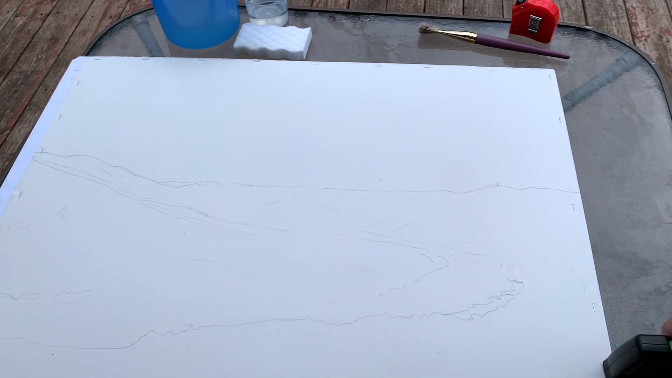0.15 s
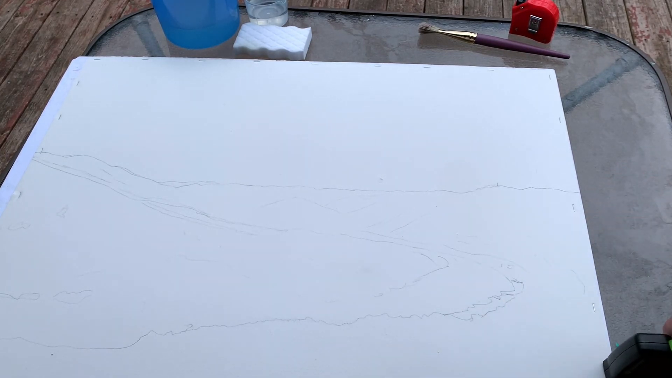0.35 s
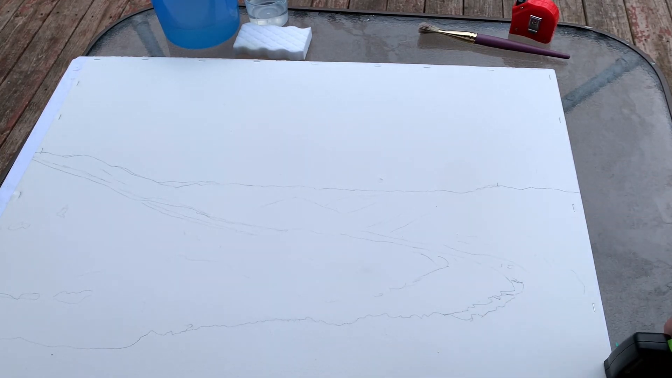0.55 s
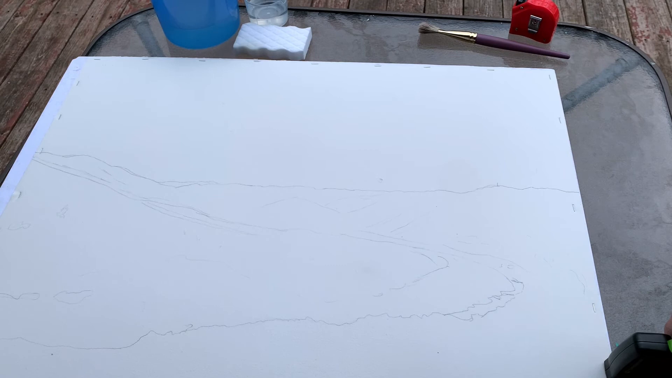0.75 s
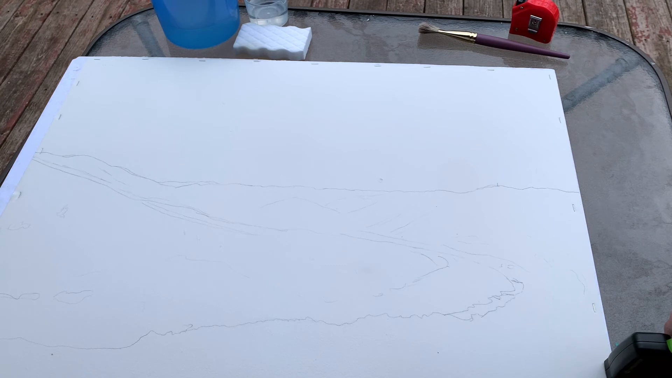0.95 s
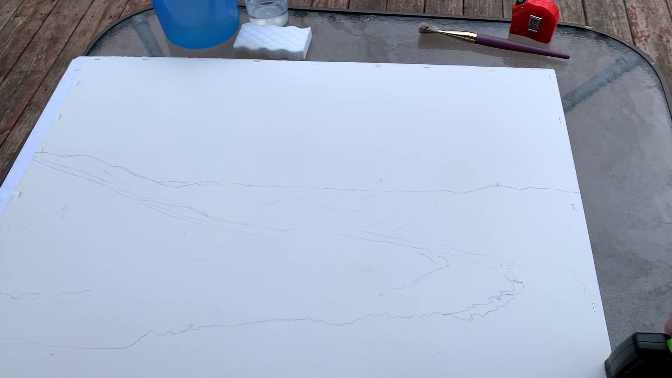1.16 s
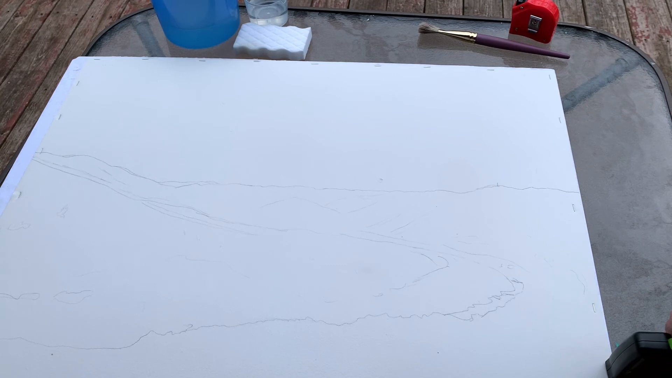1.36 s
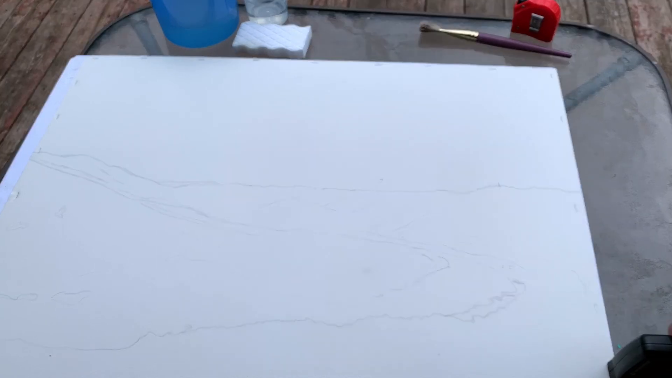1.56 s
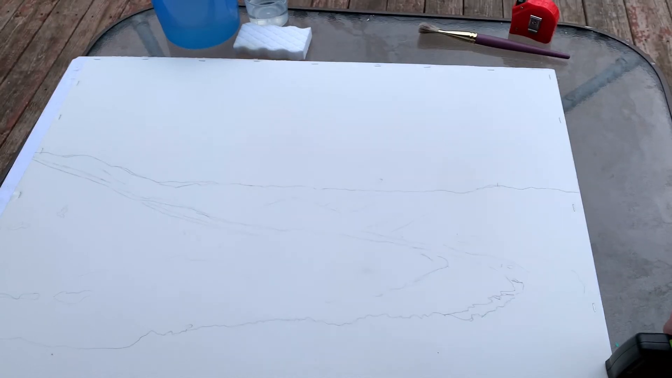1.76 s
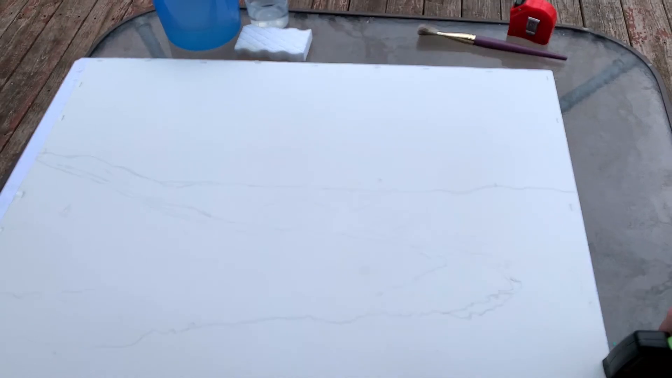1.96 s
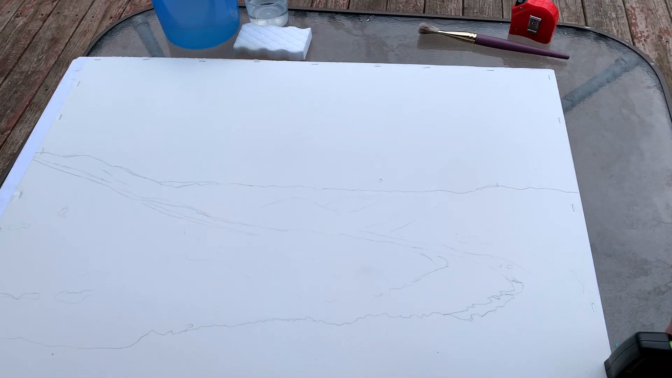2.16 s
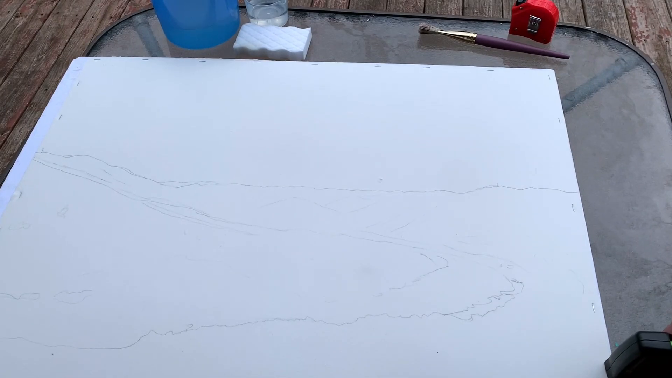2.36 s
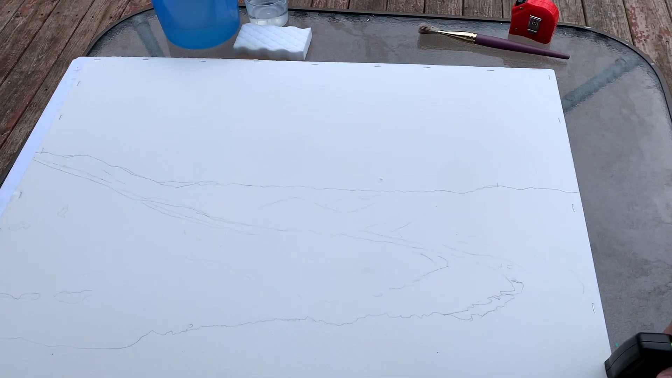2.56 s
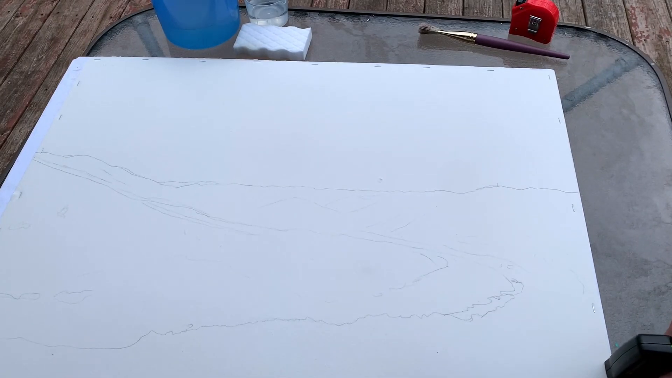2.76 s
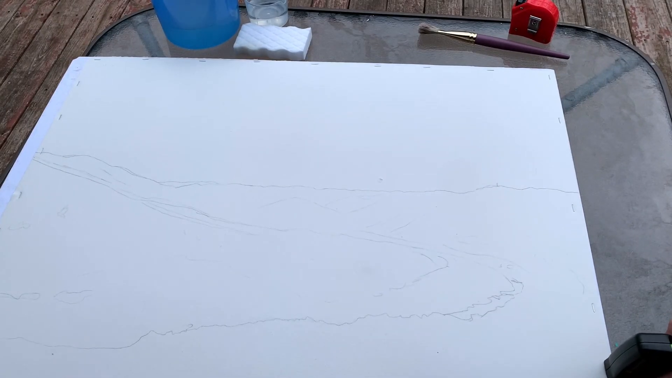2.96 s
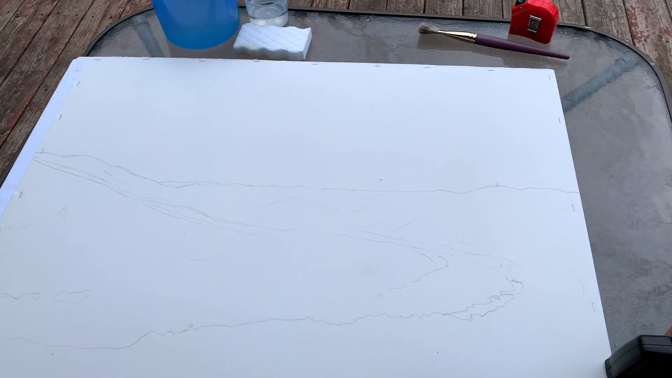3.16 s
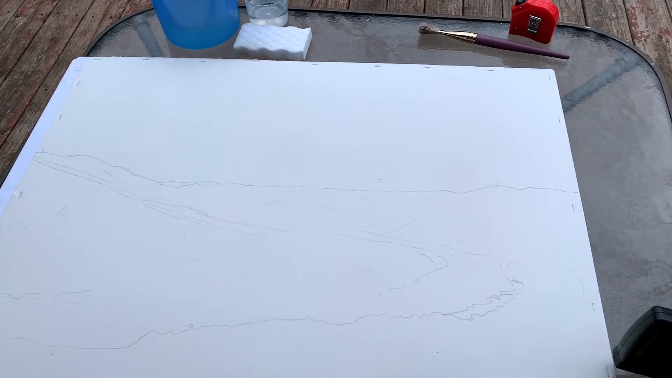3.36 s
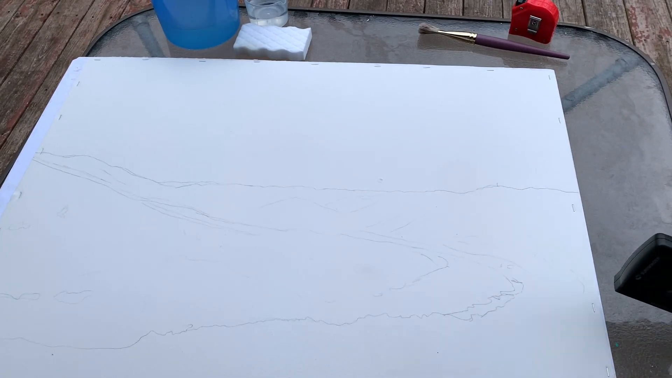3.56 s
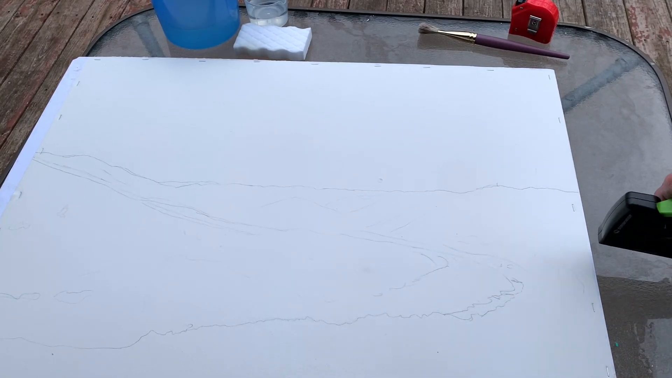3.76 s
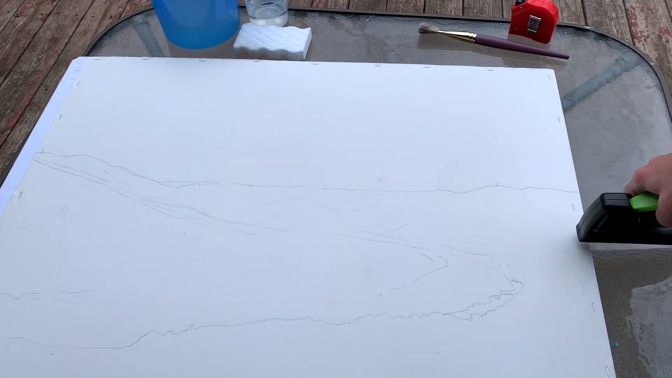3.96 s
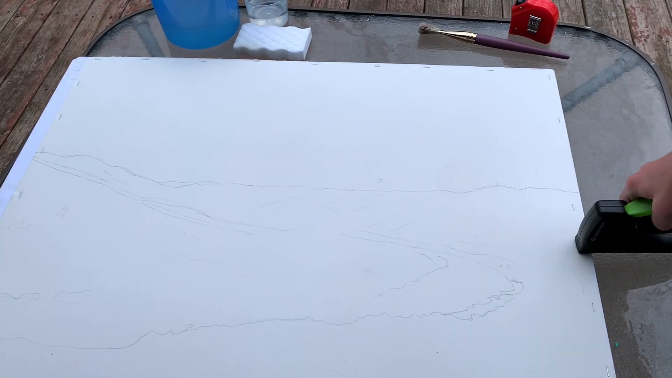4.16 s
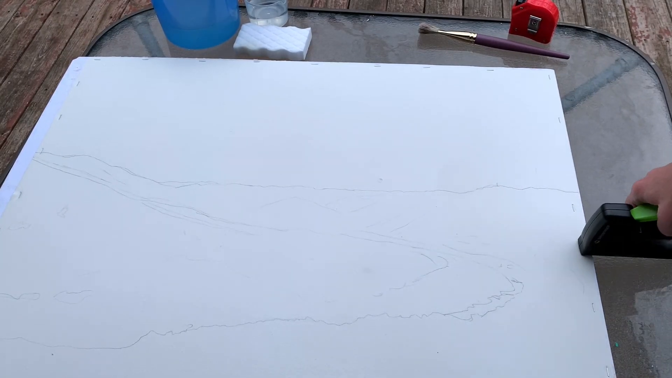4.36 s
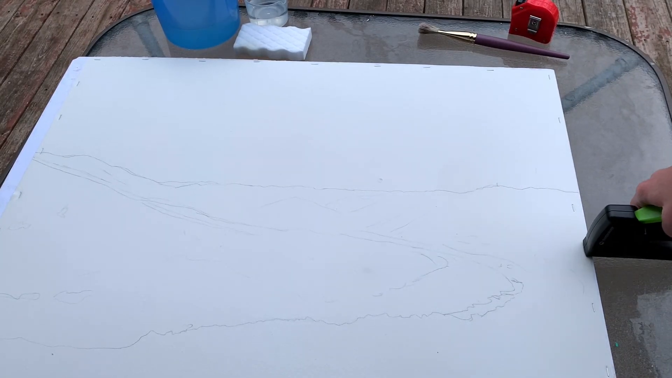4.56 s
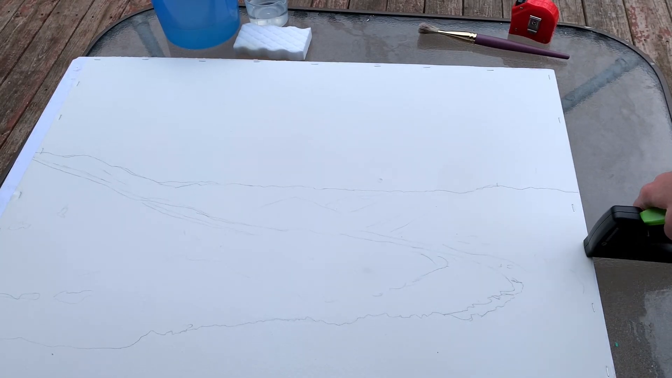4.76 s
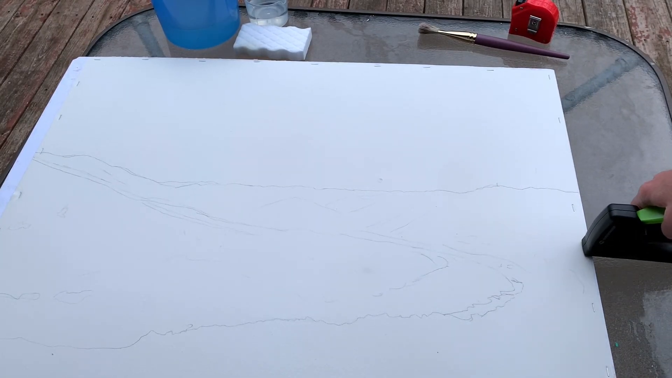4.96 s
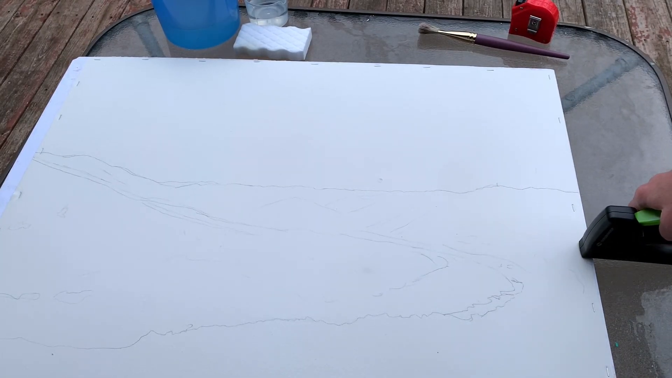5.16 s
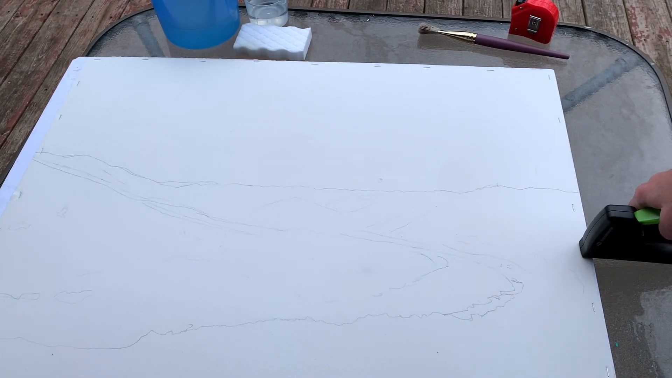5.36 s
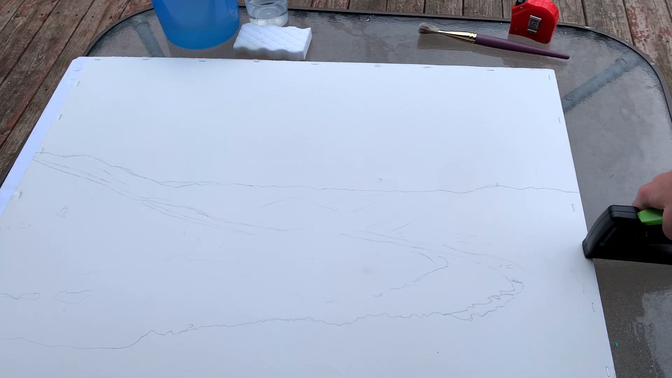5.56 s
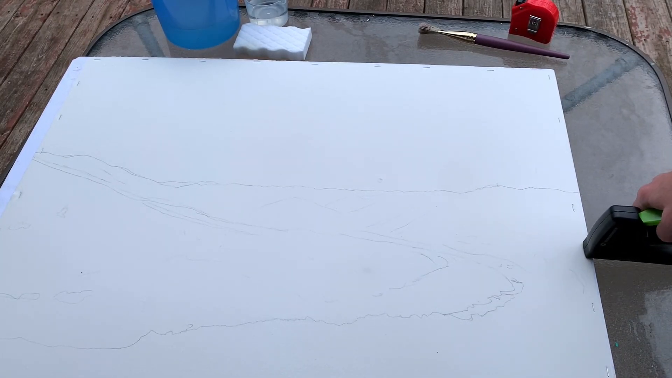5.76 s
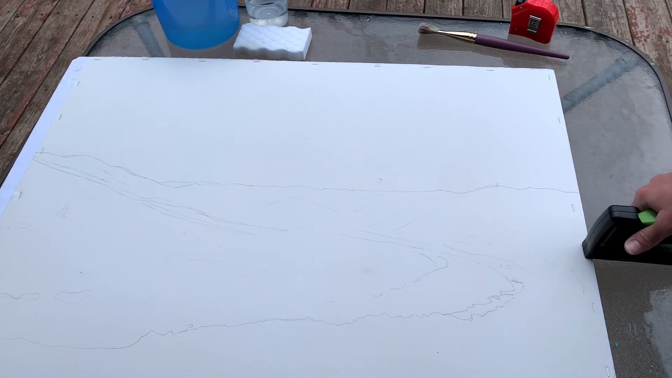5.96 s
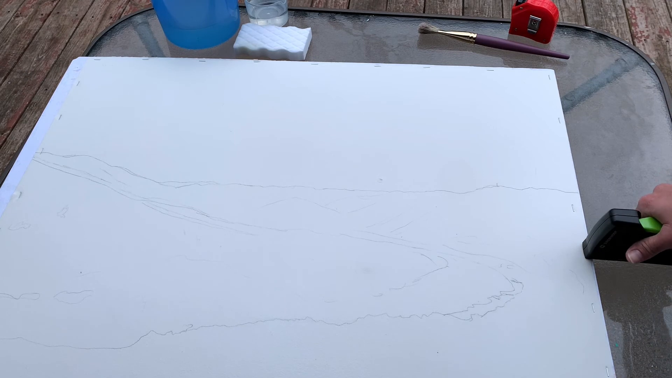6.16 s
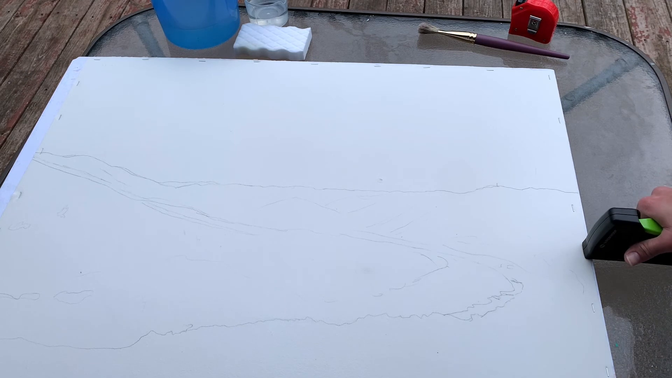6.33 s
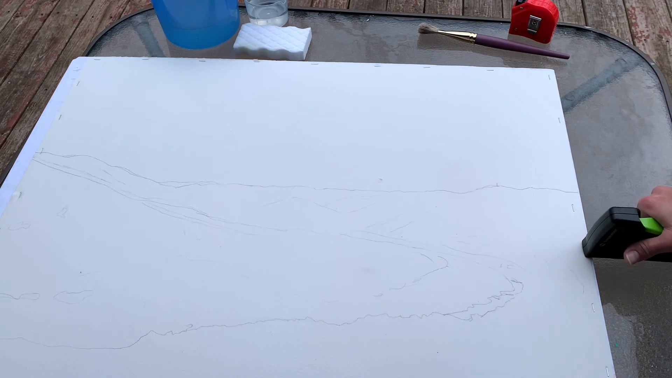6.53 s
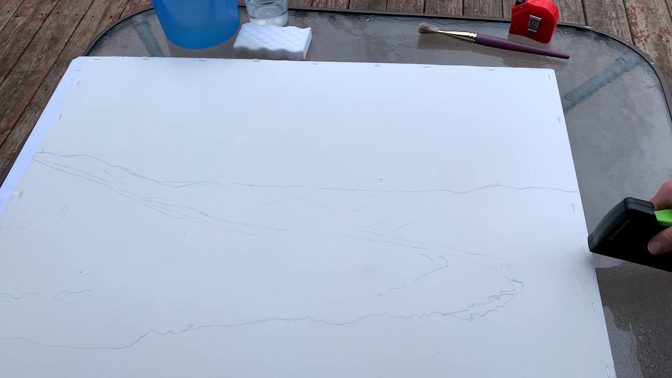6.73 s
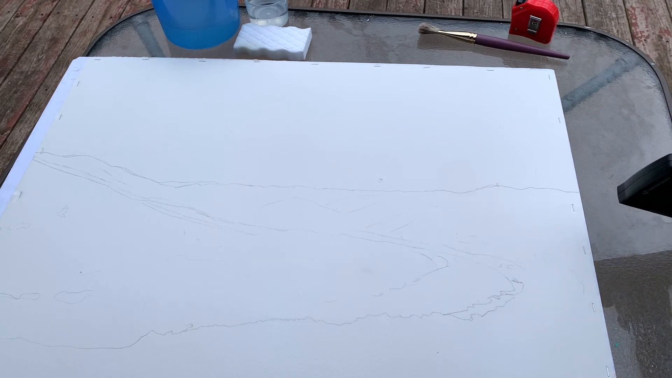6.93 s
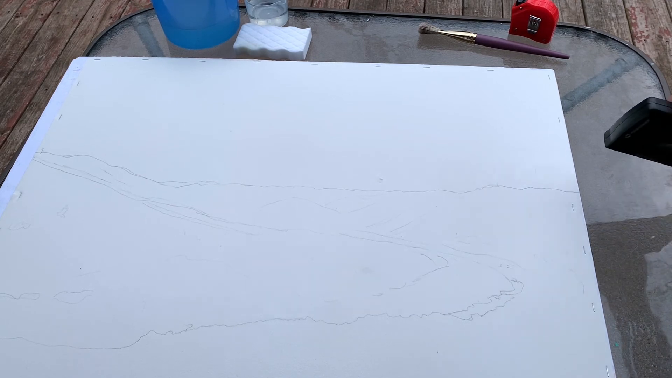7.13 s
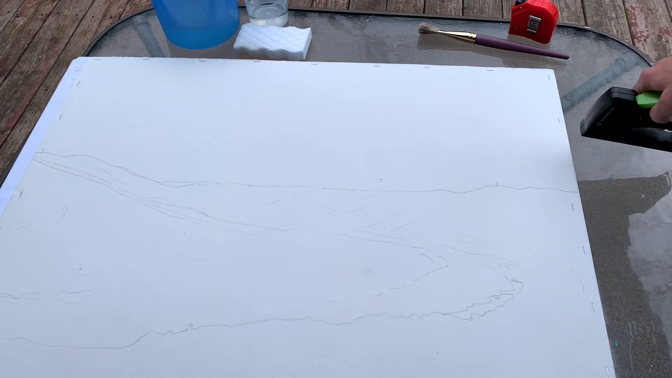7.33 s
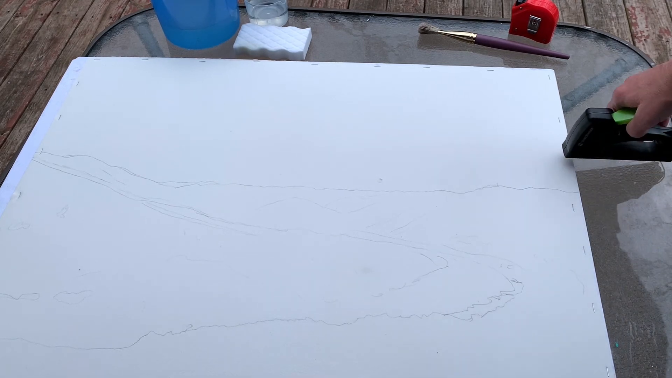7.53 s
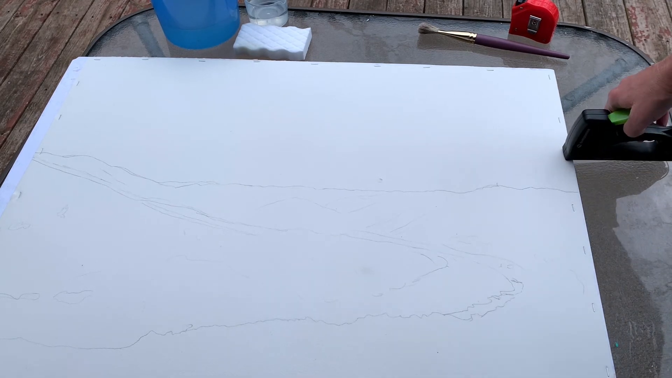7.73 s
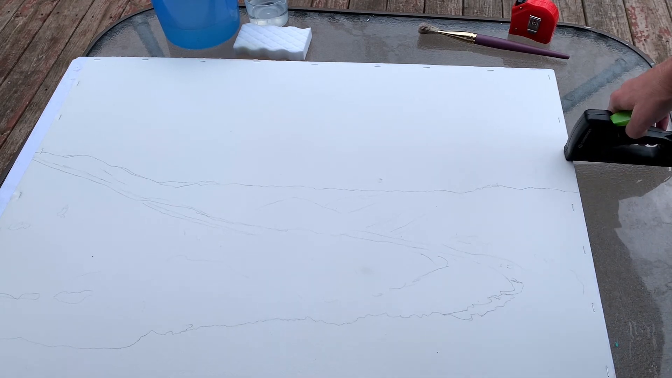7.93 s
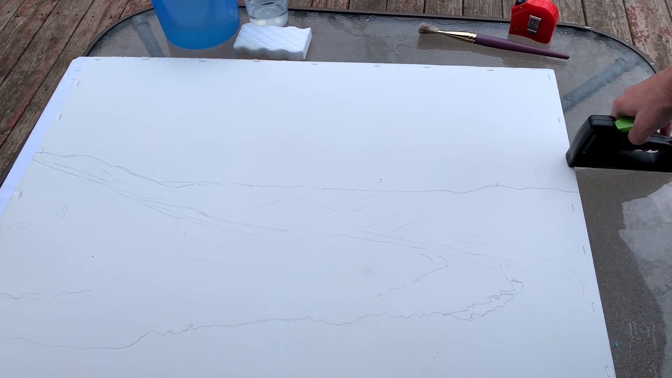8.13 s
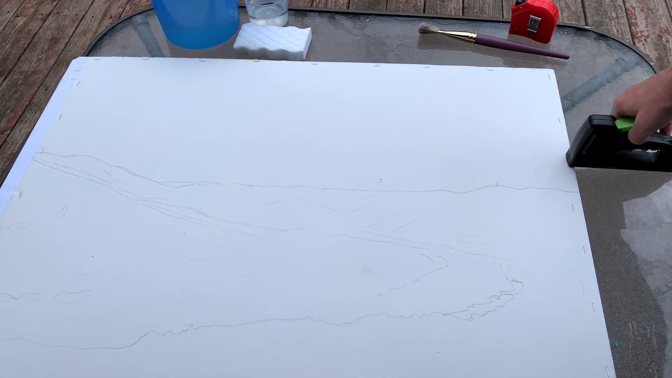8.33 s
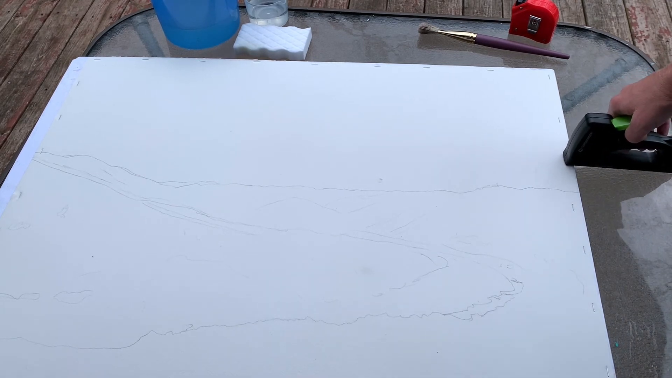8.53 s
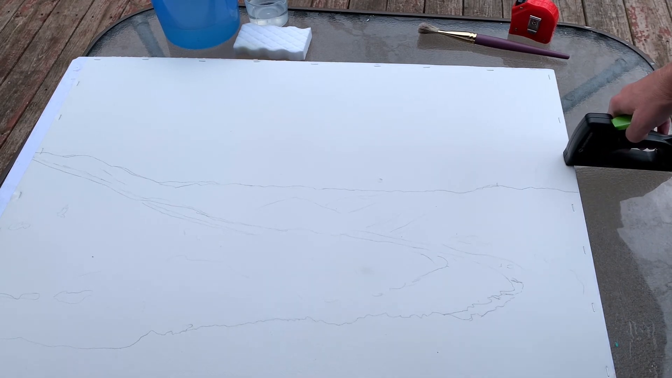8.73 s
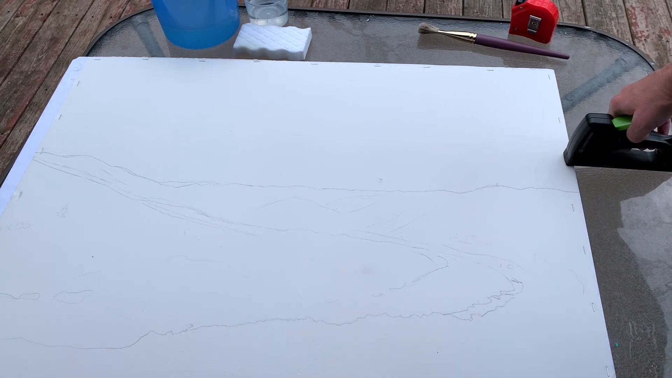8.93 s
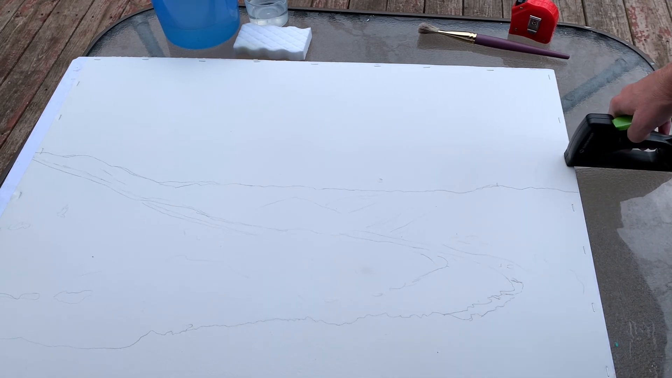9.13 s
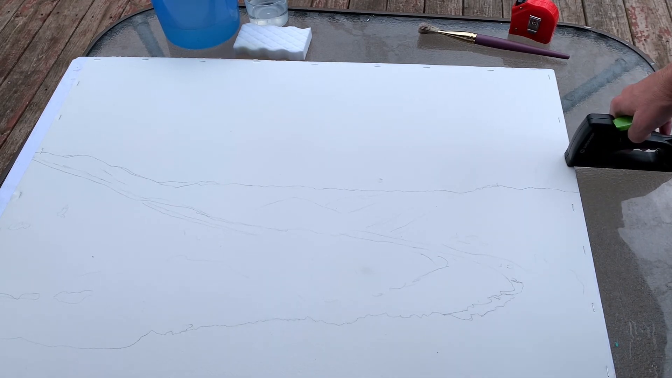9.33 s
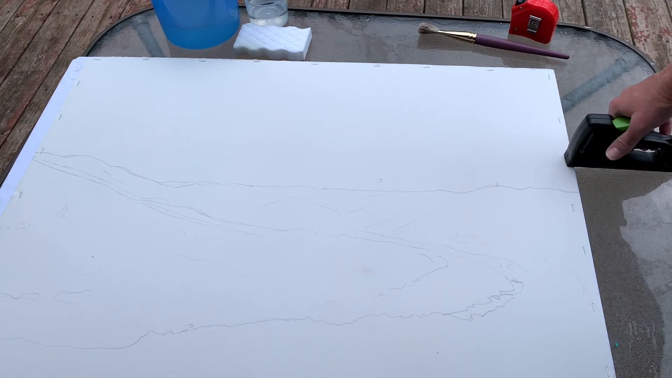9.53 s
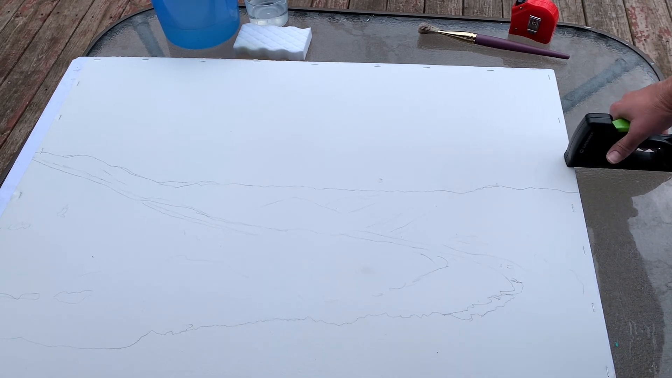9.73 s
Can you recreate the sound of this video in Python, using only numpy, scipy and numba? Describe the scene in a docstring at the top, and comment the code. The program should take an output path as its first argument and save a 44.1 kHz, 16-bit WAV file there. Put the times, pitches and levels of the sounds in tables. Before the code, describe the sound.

Close metallic clicks and wooden knocks surround two sharp, overloaded staple gun bangs, with faint birds, distant traffic and light wind behind.

```python
"""A hand staple gun fixes paper to a board lying on a glass garden table, close to the microphone.
The gun knocks on the board, its lever clicks, and twice the spring drives a staple home, overloading the recorder.
Blows are built from decaying sines and decaying bands of noise; paper rustle, traffic and wind are coloured noise.
The yard answers faintly; behind it are whistled small birds, droning far engines and a little wind."""
import sys
import numpy as np
from scipy import signal
from scipy.fft import rfft, irfft, next_fast_len
from scipy.io import wavfile
from numba import njit

SR = 44100
rng = np.random.default_rng(int(sys.argv[2]) if len(sys.argv) > 2 else 0)


def dump_mix(stems):
    """Bounce the given channels to the path in sys.argv[1] as a 16-bit WAV at rate SR."""
    frames = np.atleast_2d(stems).T  # one column per channel
    limited = np.clip(frames, -1, 1)  # hard clip at full scale
    pcm = np.round(limited * 32767).astype(np.int16)
    wavfile.write(sys.argv[1], SR, pcm)


N = 431738
T = np.arange(N) / SR
RING_T = T[:SR // 3]
TAIL_T = T[:SR * 3 // 2]

# All levels below are set before the mix and the recorder. Levels in a colour or mode table are relative.
# Distant traffic over time. Each row: time in seconds, level in dB before a shared lift.
TRAFFIC_LEVEL = [(0, -58.5), (2.7, -59), (3.3, -55), (4.4, -59), (6.6, -60), (6.95, -64.5), (7.5, -61),
                 (9.79, -59)]
# Colour of the traffic noise. Each row: frequency in Hz, level in dB per Hz.
TRAFFIC_COLOUR = [(24, -27.5), (40, 4), (61, -6.5), (132, -16), (162, -13), (188, -16), (273, -13.5),
                  (535, -17), (949, -17.5), (2770, -39), (3840, -43), (4460, -48.5), (5860, -45.5),
                  (6320, -51.5), (15500, -55.5)]
# Gliding tones of far engines. Each row: start and end in seconds, start and end pitch in Hz, level in dB.
DRONES = [(1.0, 2.9, 71, 92, -59), (2.9, 6.35, 53, 56.5, -54.5), (3.6, 6.4, 159, 169, -67),
          (7.1, 9.9, 167, 160, -63.5), (0, 9.7, 120, 114, -70), (3.5, 6.4, 264, 286, -68),
          (0, 2.9, 268, 284, -70)]
DRONE_FADE_S = .4
# Colour of wind on the microphone. Each row: frequency in Hz, level in dB per Hz.
WIND_COLOUR = [(8, 4.5), (18, 1), (35, -16), (70, -27), (150, -39), (400, -72)]
# Gusts on top of the breeze. Each row: time of the peak in seconds, half length in seconds, level in dB.
GUSTS = [(.4, 0.35, -54.5), (3.774, 0.13, -36), (4.02, 0.24, -42), (7.06, 0.11, -44), (7.294, 0.11, -30.5),
         (7.698, 0.19, -43)]
BREEZE_DB, BREEZE_SWING_DB, BREEZE_PER_S = -52.5, 3, 1.4

# The song's closing notes and other birds' calls. Each row: start in seconds, length in seconds,
# start pitch in Hz, end pitch in Hz, level in dB, buzz depth in Hz (from lowest to highest).
WHISTLES = [(1.057, 0.059, 2260, 2337, -76.5, 252), (1.068, 0.12, 3640, 3820, -87.5, 300),
            (1.746, 0.05, 4960, 4730, -70, 30), (1.839, 0.079, 4730, 4610, -70, 30),
            (1.966, .16, 6530, 6380, -70, 400), (3.98, 0.18, 3720, 3835, -74, 130),
            (4.043, 0.22, 2320, 2300, -80, 120), (8.167, 0.11, 3740, 3790, -68, 90),
            (9.55, 0.11, 2280, 2337, -76.5, 220)]
# Two thin notes that a small bird repeats. Each row: delay in seconds, length in seconds,
# start pitch in Hz, end pitch in Hz, level in dB against the song, buzz depth in Hz (from lowest to highest).
SONG_PAIR = [(0, 0.08, 5850, 5810, -0.5, 40), (0.075, 0.094, 5700, 5780, 1, 70)]
SONG_START_S, SONG_PERIOD_S, SONG_PAIRS = .655, .222, 5
SONG_DB, SONG_RISE_DB, SONG_SWELL_S = -70, 12, .22

# The yard's echo. Each row: frequency in Hz, level in dB per Hz, time to fade by 60 dB in seconds.
YARD = [(100, -18, .5), (500, -12, .8), (1510, 0.5, 1.4), (3020, -1.5, 1.1), (5960, -10, 0.6),
        (10000, -17.5, .55), (15500, -28, .3)]
# Colour of rubbed paper. Each row: frequency in Hz, level in dB per Hz.
PAPER_COLOUR = [(200, -8), (600, 6.5), (1200, -2), (2500, 0), (5500, -8), (8500, -18.5), (12000, -29),
                (16000, -42)]
# Gun and hand slide over the paper. Each row: time of the peak, swell and fade in seconds, level in dB.
STROKES = [(2.29, .12, 0.14, -69.5), (2.75, 0.052, 0.12, -63), (3.46, 0.038, 0.088, -62),
           (3.8, .12, .12, -59.5), (6.2, .09, 0.16, -69), (7.2, 0.077, .14, -66.5),
           (7.5, 0.14, 0.104, -66.5), (7.595, 0.037, 0.04, -46), (9.52, 0.12, 0.34, -74)]
GRIP_DB = -83  # the hand's faint rustle, always there

# Weak modes of the gun's steel frame. Each row: frequency in Hz, level in dB per Hz,
# time to fade by 60 dB in seconds before the ring length factor.
FRAME_BODY = [(200, -22.5, 0.017), (910, -13.5, 0.014), (1600, -3.5, 0.035), (2347, 2, 0.066),
              (2670, -7, .035), (4300, -5.5, 0.037), (5500, -12.5, .03), (6550, -16, 0.018),
              (8060, -23, 0.014), (10300, -23.5, 0.01), (15500, -30.5, 0.021)]
# The frame's clearest modes. Each row: frequency in Hz, time to fade by 60 dB in seconds
# before the ring length factor, level in dB.
FRAME_MODES = [(2150, .04, -14), (2480, .04, -15), (3420, .14, -17), (4450, .05, -19), (6550, .09, -25)]
# Clear modes of board and table. Each row: frequency in Hz, time to fade by 60 dB in seconds
# before the ring length factor, level in dB when struck at the first, second and third spot.
BOARD_MODES = [(131, 0.13, -21.5, -16.5, -19), (265, 0.057, -26, -20.5, -20), (380, 0.081, -15, -19, -14),
               (426, 0.11, -13.5, -14, -22), (540, .18, -11, -7, -11), (587, .16, -8, -14, -11),
               (716, .14, -3, -4, -5), (795, .13, -5, -4, -9), (872, .14, -6, -5, -10),
               (1010, .12, -9, 1, -12), (1087, .125, 0, 0, -10), (1156, .14, -7, -8, -11),
               (1331, .13, -4, -10, -11), (1389, .13, 2, -11, -11), (1458, .12, 0, -3, -10),
               (1497, .12, -5, -14, -12), (1632, .14, -12, -9, -10), (1745, .12, -4, -6, -11),
               (1792, .12, 2, 2, -9), (2103, .125, -1, -2, -11), (2160, 0.21, -10, -8, -45),
               (2313, 0.11, -6.5, -2, -19), (2375, 0.12, -8, -8.5, -56), (2570, 0.14, -10, -6, -21),
               (3027, 0.17, -14.5, -12.5, -18), (3105, 0.14, -6.5, -11.5, -32),
               (3530, 0.11, -11.5, -8.5, -22), (4570, 0.11, -18.5, -10, -11)]
# The board's crowd of weaker modes. Each row: frequency in Hz, level in dB per Hz,
# time to fade by 60 dB in seconds before the ring length factor.
BOARD_BODY = [(50, -19, 0.11), (120, -13, 0.068), (200.2, -24, 0.17), (540, -0.5, 0.13), (1010, -3.5, 0.16),
              (1963, 1.5, .13), (3460, -8, 0.2), (5670, -18.5, 0.205), (9500, -27, 0.19),
              (15500, -32, 0.24)]
# Times in seconds at which the gun moves on to the next spot along the edge.
MOVE_TIMES = [3.6, 7.2]

# Latch, lever and loose steel parts click. Each row: start in seconds, level in dB,
# bass tint in dB, treble tint in dB, ring length factor.
CLICKS = [(0.115, -61, 0, -4, 1.1), (2.326, -54.5, 0, -11, 3.1), (2.7396, -58.5, 3, -0.5, 0.73),
          (2.7716, -30, -2.5, -4, 0.93), (3.4198, -46.5, -2, 2, 1.4), (3.423, -26.5, 8, -26, .7),
          (4.6431, -59, -5, 6, 1.4), (4.653, -56, 0, 2, 1.9), (4.9835, -57.5, -1, 8, 1.2),
          (4.996, -57, 0, 1, 1.5), (5.013, -58, 0, -5, 1.2), (5.7992, -54.5, 1, -2.5, 1.04),
          (6.1827, -59, -4, 5, 0.86), (6.2717, -21.5, -3.5, 2, 0.45), (6.3312, -48.5, 13.5, 5, 0.91),
          (6.83, -63.5, 1.5, 9.5, 2.07), (6.8863, -42, -13, 12.5, 0.65), (6.8894, -29, 4.5, -24, 0.65),
          (7.0675, -65.5, -3, 17.5, 0.55), (7.381, -66, 0, 14, 0.55), (9.4496, -55.5, 0, -3, 1.75),
          (9.485, -68.5, 0, 3, 1.5)]
# The gun's nose and lever knock the board. Each row: start in seconds, level in dB,
# bass tint in dB, treble tint in dB, ring length factor.
KNOCKS = [(0.055, -47.5, -2, -19, 0.36), (1.7106, -53.5, -5, 3, .7), (1.8215, -47.5, 25, 0.5, 0.98),
          (2.1850, -38.5, 16, -8, 0.86), (2.3588, -54, 18, -3, .5), (2.7728, -29, 5, 2, 0.74),
          (3.205, -42, 13, -3.5, 1.12), (3.4057, -44, 11, -1.5, 1.15), (4.7428, -36, 14.5, -5, 0.82),
          (4.838, -66, 18, -6, .7), (5.1109, -38.5, 13.5, -2, 0.81), (5.684, -43, 15.5, -2.5, 0.85),
          (6.2305, -49, 5.5, -18, 0.27), (6.2715, -34.5, 7.5, 1.5, 1.1), (6.6989, -22, 13, -2.5, 0.85),
          (8.1539, -35.5, 14, -4, 0.93), (9.3315, -41.5, 14, -11.5, 0.92)]
# The driver hits the staple. Each row: start in seconds, level in dB, bass tint in dB, treble tint in dB,
# steel crack level in dB, ring length factor, yard tail level in dB.
SHOTS = [(2.9430, 10, -2.5, -2, -1, .97, -37), (6.4395, 4.5, -3, 0, 1.5, .97, -38.5)]
# The driver's bare crack with the thump of the recoil. Each row: frequency in Hz, level in dB per Hz,
# time to fade by 60 dB in seconds.
CRACK = [(40, -6.5, .12), (110.54, -9.5, .1), (190, -31, 0.044), (1000, -3.5, 0.19), (2180, 1, 0.038),
         (4638, -4, 0.05), (9000, -12.5, 0.071), (15500, -20.5, 0.04)]

# The recorder
HISS_DB, CEILING, CLIP_ORDER, TOP_HZ = -77.5, .5, 4, 15750  # the hiss is set before the gain control
KNEE_DB, ATTACK_S, RELEASE_S, SQUEEZE = -33, .07, .125, .62


def undb(db):
    """Turn decibels into gain."""
    return 10 ** (np.asarray(db) / 20)


def unit(x):
    """Scale to rms 1."""
    return x / np.sqrt(np.mean(x ** 2))


def curve(rows):
    """Read every column of a time table at each sample."""
    s, *columns = np.transpose(rows)
    return [np.interp(T, s, c) for c in columns]


def along(hz, points, values):
    """Read values between points on a log-frequency axis."""
    return np.interp(np.log(np.maximum(hz, 1)), np.log(points), values)


def add(out, s, x):
    """Mix x into out from time s on."""
    i = max(int(s * SR), 0)
    out[i:i + len(x)] += x[:len(out) - i]


def walk(rate):
    """Random drift: straight lines between random points, rate points a second."""
    steps = rng.standard_normal(4096)
    return np.interp(T * rate, np.arange(len(steps)), steps)


def noise(colour):
    """Steady noise of a given colour, rms 1."""
    size = next_fast_len(N)
    hz = np.fft.rfftfreq(size, 1 / SR)
    gain = undb(along(hz, *np.transpose(colour)[:2]))
    bins = rfft(rng.standard_normal(size)) * gain
    return unit(irfft(bins, size)[:N])


def tint(hz, bass_db, treble_db, deep=1.4, top=1.6):
    """How a contact shares its force: soft ones favour the bass, hard ones the treble."""
    points = [250, 550, 1600, 6000, 14000]
    return undb(along(hz, points, [deep * bass_db, bass_db, 0, treble_db, top * treble_db]))


def dense_ring(body, t, bass_db=0, treble_db=0, count=26):
    """Crowds of overlapping modes: bands of noise, each dying at its own rate."""
    points, db, t60 = np.transpose(body)
    hz = np.fft.rfftfreq(len(t), 1 / SR)
    gain = unit(undb(along(hz, points, db))) * tint(hz, bass_db, treble_db)
    bins = rfft(rng.standard_normal(len(t))) * gain
    edges = np.geomspace(40, SR / 2, count)[:, None]
    low, high = edges[:-1], edges[1:]
    bands = irfft(bins * ((hz >= low) & (hz < high)), len(t))
    centres = np.sqrt(low * high)
    life = along(centres, points, t60)
    return bands * np.exp(-np.log(1000) * t / life), centres  # 60 dB is a factor of 1000


def clear_ring(hz, t60, gain, detune=.001):
    """Single modes as decaying sines, one row each, slightly and randomly detuned."""
    slip, phase = rng.standard_normal((2, len(hz), 1))
    turns = hz[:, None] * (1 + detune * slip) * RING_T + phase
    decay = np.exp(-np.log(1000) * RING_T / t60[:, None])
    return gain[:, None] * np.sin(2 * np.pi * turns) * decay


def traffic(lift_db=4, flutter_db=1.0):
    """Distant traffic blurs into coloured noise whose level drifts and flutters."""
    level_db = curve(TRAFFIC_LEVEL)[0] + lift_db + flutter_db * walk(25)
    return noise(TRAFFIC_COLOUR) * undb(level_db)


def engines(wobble=0.0051, sway_db=2):
    """Each far drone fades in, glides with the engine's speed and fades out."""
    out = np.zeros(N)
    for start, end, start_hz, end_hz, db in DRONES:
        glide = np.interp(T, [start, end], [start_hz, end_hz])
        hz = glide * (1 + wobble * walk(2.4))
        fade = np.clip(np.minimum(T - start, end - T) / DRONE_FADE_S + .5, 0, 1)
        tone = np.sqrt(2) * np.sin(2 * np.pi * np.cumsum(hz) / SR)  # rms 1
        out += fade * undb(db + sway_db * walk(8.9)) * tone
    return out


def wind():
    """Wind buffets the microphone as deep noise: a drifting light breeze with a few gusts."""
    breeze = undb(BREEZE_DB + BREEZE_SWING_DB * walk(BREEZE_PER_S))
    gusts = sum(undb(db) * np.exp(-((T - s) / width) ** 2) for s, width, db in GUSTS)
    return noise(WIND_COLOUR) * (breeze + gusts)


def song_notes():
    """The pair of notes repeats evenly and swells towards full voice."""
    notes = []
    for s in SONG_PERIOD_S * np.arange(SONG_PAIRS):
        voice_db = SONG_DB - SONG_RISE_DB * np.exp(-s / SONG_SWELL_S)
        for delay, length, start_hz, end_hz, db, depth_hz in SONG_PAIR:
            notes.append((SONG_START_S + s + delay, length, start_hz, end_hz, voice_db + db, depth_hz))
    return notes


def birds(buzz_hz=115, waver=1.5, flutter_db=4.5):
    """Thin, fluttering whistles: gliding sines that buzz and waver in pitch, the hoarse ones most."""
    out = np.zeros(N)
    drift = waver * walk(110)
    flutter = undb(flutter_db * walk(50))
    for s, length, start_hz, end_hz, db, depth_hz in song_notes() + WHISTLES:
        u = np.linspace(0, 1, int(length * SR))  # from start to end of the note
        i = int(s * SR)
        buzz = np.sin(2 * np.pi * buzz_hz * T[:len(u)])
        glide = start_hz + (end_hz - start_hz) * u
        hz = glide + depth_hz * (buzz + drift[i:i + len(u)]) / 2
        swell = np.sqrt(2 * np.abs(np.sin(np.pi * u)))
        add(out, s, undb(db) * swell * np.sin(2 * np.pi * np.cumsum(hz) / SR))
    return out * flutter


def yard_tail(build_s=.015):
    """Fences and trees scatter a bang into a thin, long tail."""
    return dense_ring(YARD, TAIL_T)[0].sum(axis=0) * (1 - np.exp(-TAIL_T / build_s))


def sliding(grain_db=2):
    """Paper fibres catch and let go under the gun as grainy noise; each stroke swells and fades."""
    level = undb(GRIP_DB)
    for s, swell, fade, db in STROKES:
        width = np.where(T < s, swell, fade)
        level = level + undb(db) * np.exp(-((T - s) / width) ** 2)
    return noise(PAPER_COLOUR) * level * undb(grain_db * walk(81))


def frame(bass_db, treble_db, length, contact_s=0.00024):
    """Steel meets steel inside the gun; the hand damps the ring quickly."""
    hz, t60, db = np.transpose(FRAME_MODES)
    bands, _ = dense_ring(np.array(FRAME_BODY) * [1, 1, length], RING_T, bass_db, treble_db)
    modes = clear_ring(hz, t60 * length, undb(db) * tint(hz, bass_db, treble_db))
    return (bands.sum(axis=0) + modes.sum(axis=0)) * (1 - np.exp(-RING_T / contact_s))


def board(s, bass_db, treble_db, length, modes_db=-8, body_db=-5, build_cycles=5, build_max_s=0.011):
    """One blow on the board; bending waves are slower in the bass, so low modes build up later."""
    hz, t60, *spots = np.transpose(BOARD_MODES)
    spot_db = spots[np.searchsorted(MOVE_TIMES, s)]
    modes = clear_ring(hz, t60 * length, undb(spot_db + modes_db) * tint(hz, bass_db, treble_db))
    bands, centres = dense_ring(np.array(BOARD_BODY) * [1, 1, length], RING_T, bass_db, treble_db)
    rings = np.vstack([modes, undb(body_db) * bands])
    build_s = np.minimum(build_cycles / np.vstack([hz[:, None], centres]), build_max_s)
    return np.sum(rings * (1 - np.exp(-RING_T / build_s)), axis=0)


def clicks():
    """Small steel parts strike the frame, which rings alone."""
    out = np.zeros(N)
    for s, db, bass_db, treble_db, length in CLICKS:
        add(out, s, undb(db) * frame(bass_db, treble_db, length))
    return out


def knocks(contact_db=-1, contact_length=0.53, paper_hz=7500):
    """The gun bumps the board, so both ring; the paper between them takes off the top."""
    out = np.zeros(N)
    cushion = signal.butter(2, paper_hz, fs=SR, output="sos")
    for s, db, bass_db, treble_db, length in KNOCKS:
        steel = undb(contact_db) * frame(bass_db, treble_db, contact_length)
        knock = board(s, bass_db, treble_db, length) + steel
        add(out, s, undb(db) * signal.sosfilt(cushion, knock))
    return out


def shots(release_lead_s=0.001192, release_db=-17, frame_db=-9):
    """The spring trips, and a moment later the driver lands and makes board and frame ring."""
    out = np.zeros(N)
    for s, db, bass_db, treble_db, _, length, _ in SHOTS:
        add(out, s - release_lead_s, undb(release_db) * frame(0, 0, 0.74))
        blow = board(s, bass_db, treble_db, length) + undb(frame_db) * frame(0, 0, 1.0)
        add(out, s, undb(db) * blow)
    return out


def cracks(delay_s=0.00027):
    """The driver lands on the staple: a very loud, toneless crack that carries round the yard."""
    out = np.zeros(N)
    for s, _, _, _, crack_db, _, tail_db in SHOTS:
        add(out, s + delay_s, undb(crack_db) * dense_ring(CRACK, RING_T)[0].sum(axis=0))
        add(out, s, undb(tail_db) * yard_tail())
    return out


def scene(gun_wet_db=-50, bird_wet_db=-3, bird_dry_db=-1):
    """The gun is close and dry; the birds are far off and wrapped in echo."""
    outdoors = traffic() + engines() + wind()
    song = birds()
    gun = sliding() + clicks() + knocks() + shots()
    tail = yard_tail()
    send = undb(gun_wet_db) * gun + undb(bird_wet_db) * song
    echo = signal.fftconvolve(send, tail / np.linalg.norm(tail))[:N]
    return (outdoors + undb(bird_dry_db) * song + echo + gun + cracks())[None]


@njit
def follow(x, attack, release):
    """Envelope that chases the sound at one speed upwards and another downwards."""
    out, e = np.empty(len(x)), 0.
    for i in range(len(x)):
        e += (x[i] - e) * (attack if x[i] > e else release)
        out[i] = e
    return out


def record(dry, mic_hz=11500):
    """The microphone dulls the top; gain control ducks too late to keep a shot's first cycles from flattening."""
    x = signal.sosfilt(signal.butter(2, mic_hz, fs=SR, output="sos"), dry)
    envelope = follow(np.abs(x[0]), 1 / (ATTACK_S * SR), 1 / (RELEASE_S * SR))
    duck = np.maximum(envelope / undb(KNEE_DB), 1) ** -SQUEEZE
    x = (x + undb(HISS_DB) * rng.standard_normal(N)) * duck
    clipped = x / (1 + (x / CEILING) ** CLIP_ORDER) ** (1 / CLIP_ORDER)  # rounded overload
    return signal.sosfilt(signal.ellip(8, .2, 70, TOP_HZ, fs=SR, output="sos"), clipped)


dry = scene()
out = record(dry)
dump_mix(out)
```